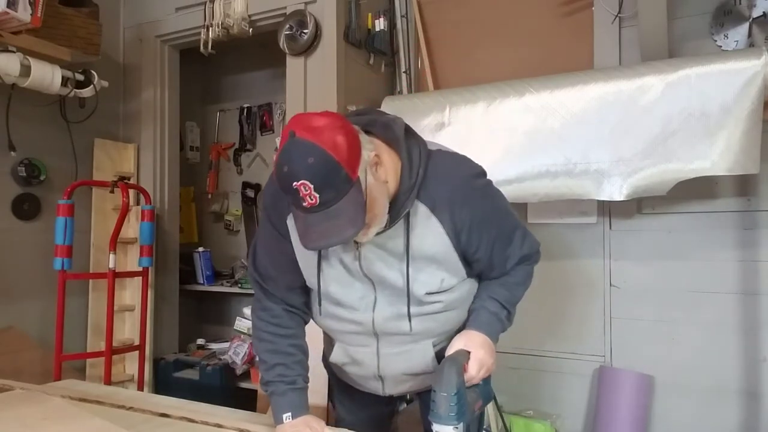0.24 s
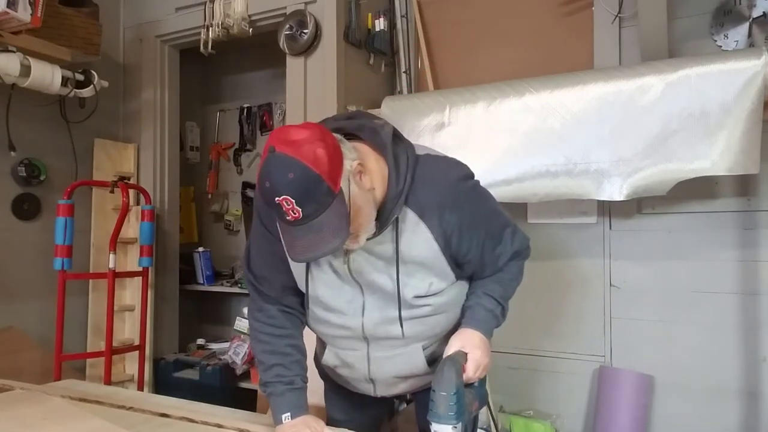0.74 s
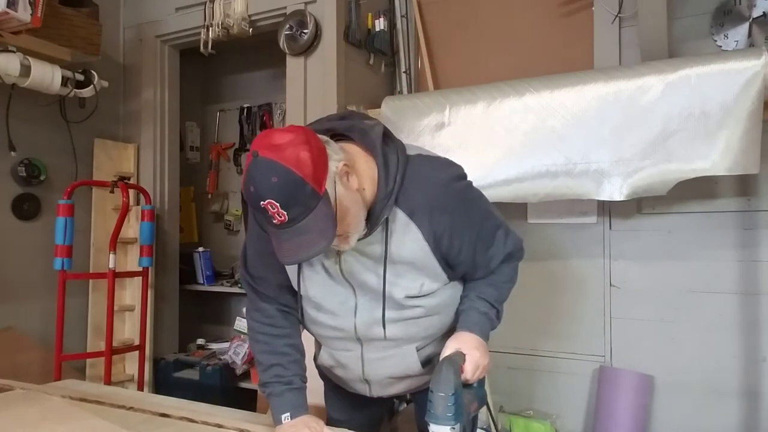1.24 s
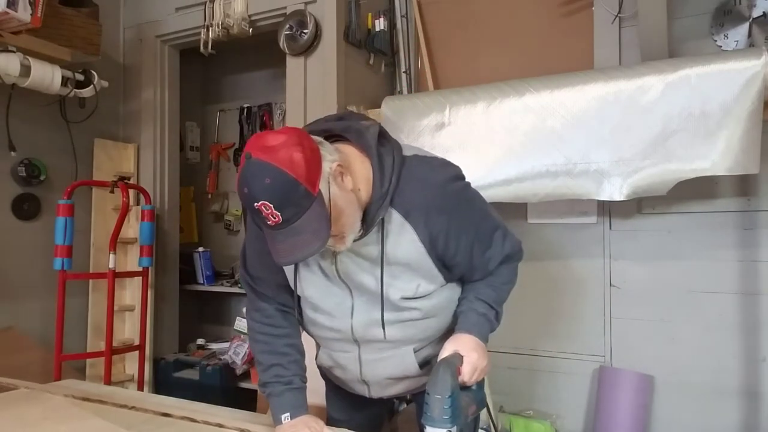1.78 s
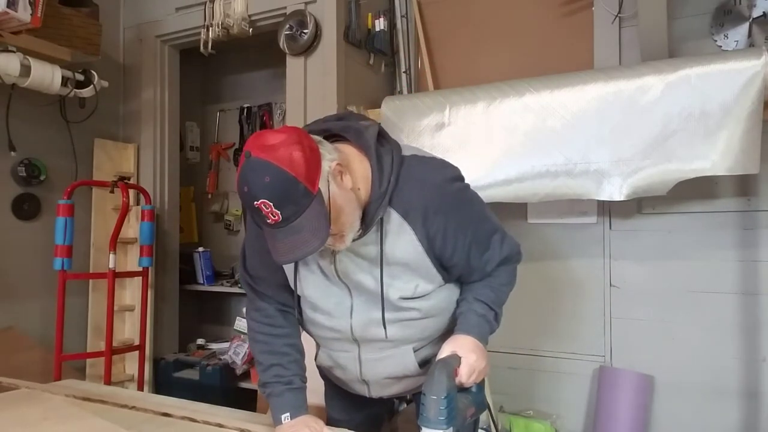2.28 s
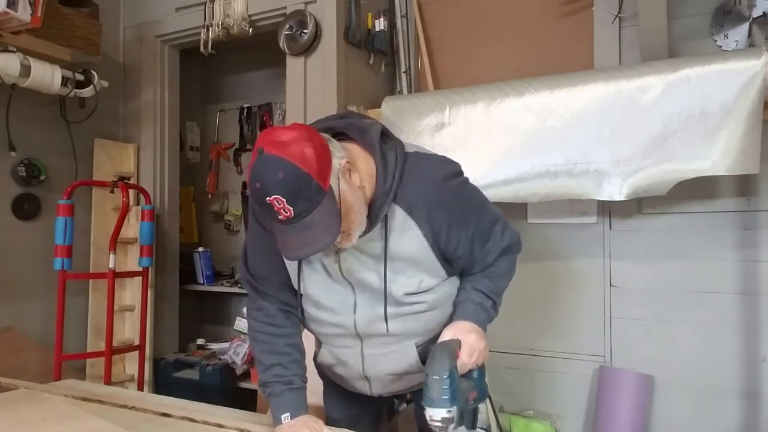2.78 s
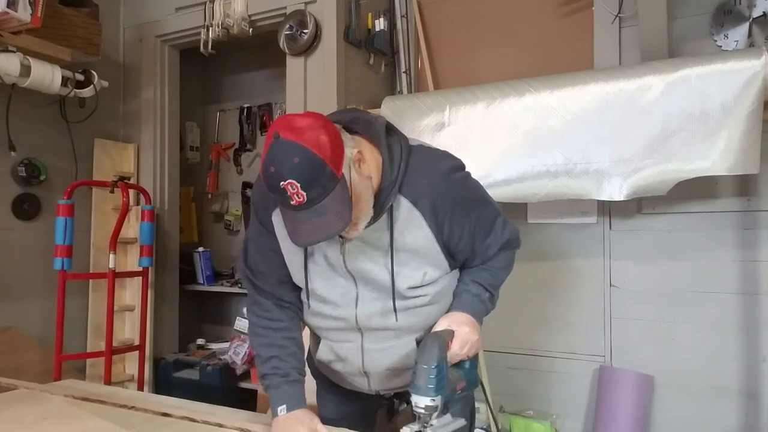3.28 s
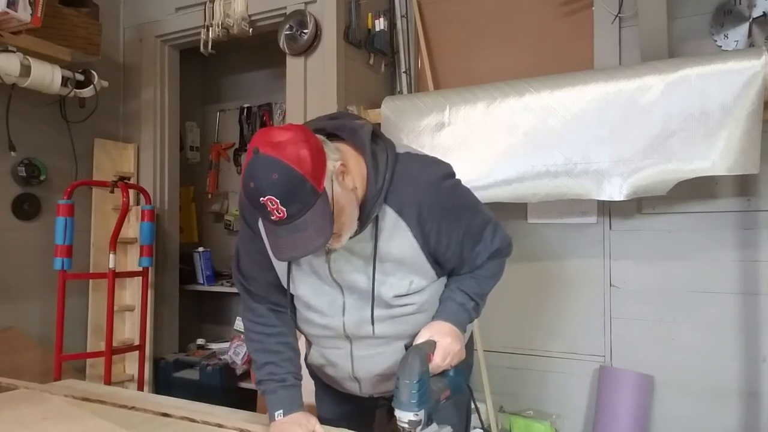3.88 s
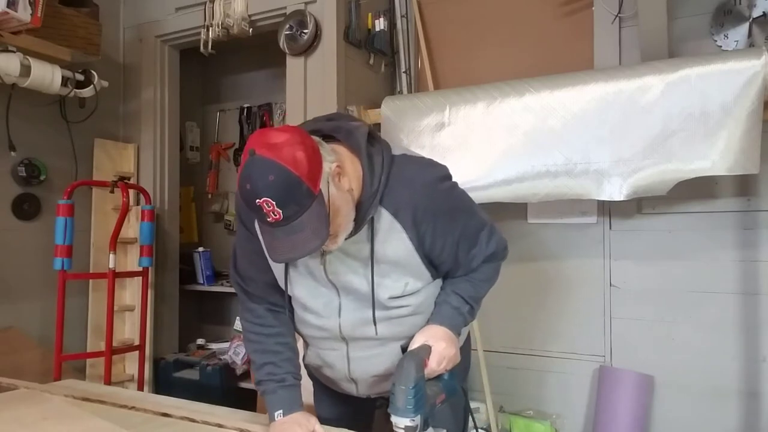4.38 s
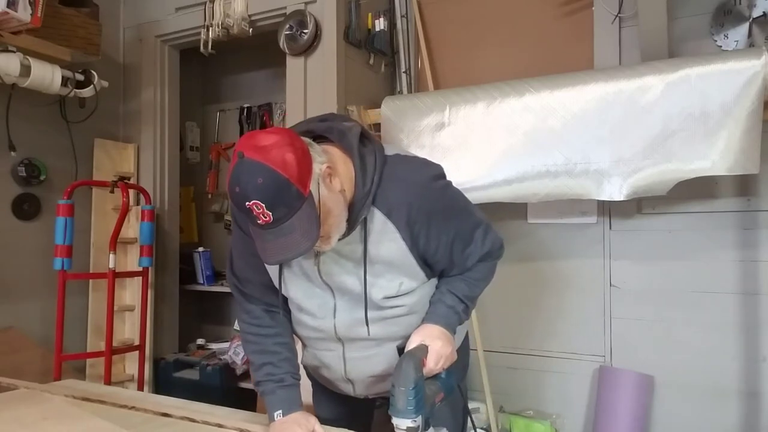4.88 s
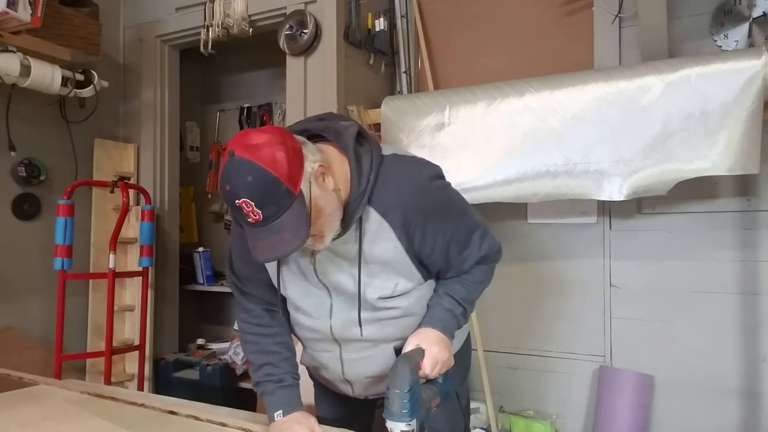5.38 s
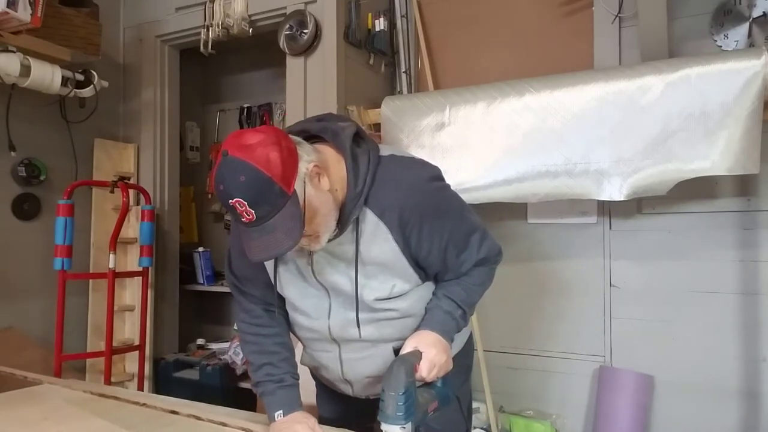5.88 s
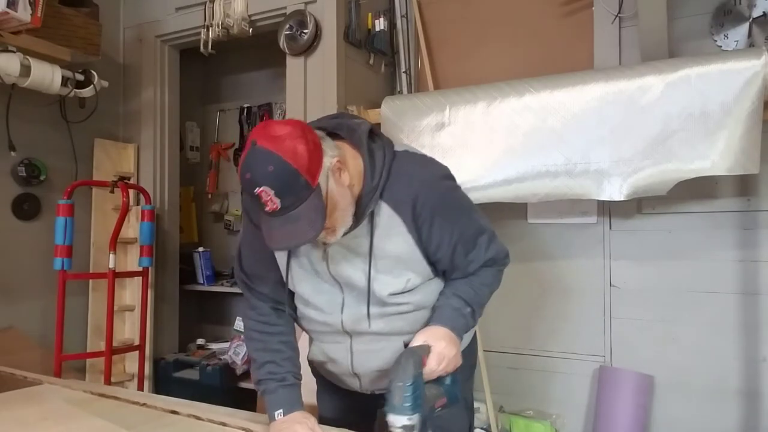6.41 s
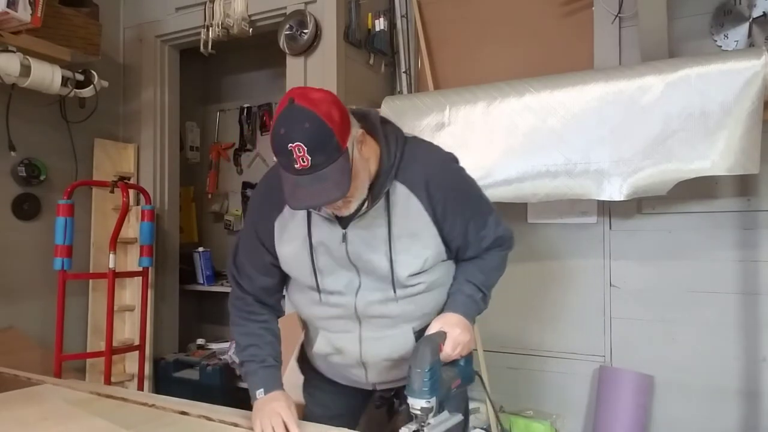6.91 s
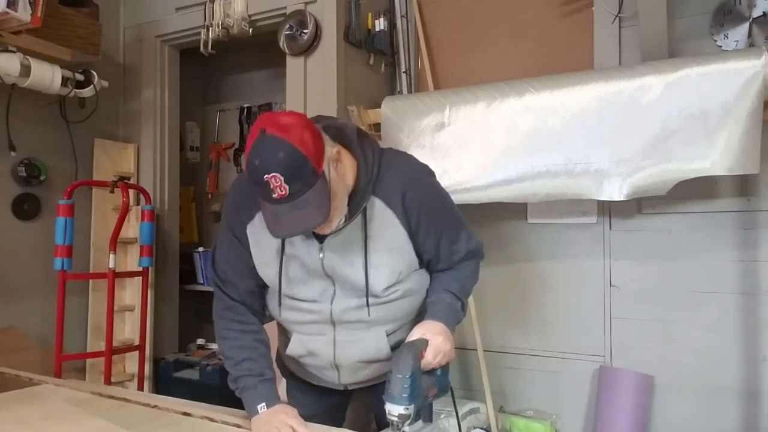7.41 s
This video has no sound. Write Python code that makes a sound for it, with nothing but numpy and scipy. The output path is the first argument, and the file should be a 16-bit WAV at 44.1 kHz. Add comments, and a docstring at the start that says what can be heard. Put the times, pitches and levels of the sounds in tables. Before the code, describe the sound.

In a garage, an electric jigsaw buzzes and tears wood, coasts down whining, wood thumps and rocks, then it cuts again and winds down.

```python
"""A jigsaw makes two short cuts in a sheet of wood in a garage, a couple of metres from two close microphones.
Each time the motor spins up, the blade rasps through, the sheet chatters as the saw is lifted out,
and the motor coasts down with a falling whine. Between the cuts the wood is knocked about and a loose
piece rocks to rest. Stroke-locked clicks, noise and tones make the saw; decaying modes make the wood;
coloured noise makes a faint opening fade, one slide of a sleeve and the quiet background."""
import sys
import numpy as np
from scipy import signal
from scipy.fft import rfft, irfft, next_fast_len
from scipy.io import wavfile
from scipy.ndimage import uniform_filter1d

SR = 44100
rng = np.random.default_rng(int(sys.argv[2]) if len(sys.argv) > 2 else 0)


def output_pcm(signal):
    """Save a mono or channel-first signal as 16-bit PCM at the path in sys.argv[1].

    Samples are clipped to [-1, 1] before scaling.
    """
    pcm = np.clip(np.atleast_2d(signal).T, -1, 1) * 32767
    wavfile.write(sys.argv[1], SR, np.round(pcm).astype(np.int16))


N = 337360
TIME = np.arange(N) / SR

# squeals of the binding blade: t/s, length/s, f/Hz, width/Hz, relative level/dB
SQUEALS = [(.89, 0.071, 2620, 160, -25.5), (1.04, 0.17, 2620, 200, -28.5), (1.13, 0.21, 4950, 400, -32.5),
           (1.418, .2, 3850, 180, -31), (1.875, 0.15, 4315, 100, -26), (1.905, 0.13, 2147, 130, -27.5),
           (2.062, .22, 4080, 200, -31), (5.093, 0.107, 2550, 250, -30), (5.417, 0.19, 3900, 148, -48),
           (6.01, 0.17, 4370, 400, -27.5), (6.038, 0.093, 2104, 400, -21.5)]
# blade strokes per s: deep in the cut, as the blade comes free, and where fan drag equals bearing friction
LOADED_RATE, FREE_RATE, DRAG_RATE = 46.2, 51, 50


def from_db(db):
    """Decibels to gain."""
    return 10 ** (np.asarray(db) / 20)


def rms_one(x):
    """Scale to rms 1."""
    return x / np.sqrt(np.mean(x ** 2) + 1e-20)


def lowpass(x, hz):
    """Two-pole low-pass."""
    return signal.sosfilt(signal.butter(2, min(hz, SR / 3), fs=SR, output="sos"), x)


def highpass(x, hz):
    """Two-pole high-pass."""
    return signal.sosfilt(signal.butter(2, hz, "high", fs=SR, output="sos"), x)


def drift(hz):
    """Random wander of rms 1, slower than the given frequency."""
    return rms_one(lowpass(rng.standard_normal(N + SR), hz)[SR:])


def swell(s, length):
    """Bell-shaped gain around a moment."""
    return np.exp(-(2 * (TIME - s) / length) ** 2)


def ring(x, hz, width_hz):
    """Resonance with gain 1 at its top."""
    r = np.exp(-np.pi * width_hz / SR)
    zeros = (1 - r * r) / 2 * np.array([1, 0, -1])
    poles = [1, -2 * r * np.cos(2 * np.pi * hz / SR), r * r]
    return signal.lfilter(zeros, poles, x + 1e-18)


def response(spectrum, size=8192):
    """Causal (minimum-phase) impulse response with the given spectrum."""
    hz, db = np.transpose(spectrum)
    grid = np.maximum(np.arange(size // 2 + 1) * SR / size, 1)
    gain = from_db(np.interp(np.log(grid), np.log(hz), db))
    # fold the cepstrum onto positive time
    cepstrum = irfft(np.log(gain))
    cepstrum[1:size // 2] *= 2
    cepstrum[size // 2 + 1:] = 0
    return irfft(np.exp(rfft(cepstrum)))


def colour(x, spectrum):
    """Give a white signal a spectrum and keep its power."""
    h = response(spectrum)
    return signal.oaconvolve(x, h / np.linalg.norm(h))[:N]


def even_out(h, size=200):
    """Keep the fine comb of a room response and level its broad colour."""
    spectrum = rfft(h, 2 * len(h))
    power = np.abs(spectrum) ** 2
    for _ in range(4):
        power = uniform_filter1d(power, size)
    return irfft(spectrum / np.sqrt(power))[:len(h)]


def two_ports(mid, side):
    """Two close microphones hear nearly the same bass and different treble."""
    # side against mid in the diffuse field: f/Hz, level/dB
    width = [(40, -23), (170, -18), (350, -8.5), (700, -2.5), (1400, 1.5), (4000, 1), (12000, 3)]
    side = signal.oaconvolve(side, response(width))[:len(mid)]
    return np.array([mid + side, mid - side])


def garage(x, t60_s=0.45, direct_db=-2, early_db=-1, early_s=0.0039):
    """Direct sound, close reflections from sheet and wall, then a diffuse tail."""
    t = TIME[:SR * 3 // 4]
    tail = from_db(-60 * t / t60_s) * (t > .004)
    early = np.exp(-t / early_s) * (t > .0005)
    spread = np.hypot(tail / np.linalg.norm(tail), from_db(early_db) * early / np.linalg.norm(early))
    mid, side = rng.standard_normal((2, len(t))) * spread
    mid[0] += from_db(direct_db)
    ports = two_ports(even_out(mid), from_db(-2.5) * even_out(side))
    return signal.oaconvolve(x[None], ports, axes=1)[:, :N]


def travelling(x, turns_per_s=.7):
    """As the saw moves along, its pattern of reflections keeps changing."""
    angle = 2 * np.pi * turns_per_s * TIME
    # the second pattern is a quarter cycle out of phase, so the level holds
    quarter = np.imag(signal.hilbert(x, next_fast_len(N)))[:N]
    return np.cos(angle) * garage(x) + np.sin(angle) * garage(quarter)


def quiet_garage():
    """The background between events is steady coloured noise, wide in the treble."""
    # f/Hz, relative level/dB
    quiet = [(15, -22.5), (25, 0), (27, -5.5), (53, -8.5), (148, -16.5), (297, -7.5), (582, -17.5),
             (1300, -20), (8810, -39.5), (13500, -31), (15500, -26)]
    mid, side = (colour(white, quiet) for white in rng.standard_normal((2, N)))
    return highpass(from_db(-66.5) * two_ports(mid, side), hz=35)


def soft_noises():
    """A faint noise fades at the very start; then a sleeve sliding over the sheet makes one soft swell."""
    # opening noise, then sleeve: t/s, length/s, level/dB
    soft_times = [(0, 0.043, -63.5), (0.261, 0.153, -55)]
    # f/Hz, relative level/dB
    soft_spectrum = [(59, -69), (100, -37), (152, -10), (268, -14), (502, -11), (718, -16), (1140, -13),
                     (15000, -36.5)]
    gain = sum(from_db(db) * swell(s, length) for s, length, db in soft_times)
    return gain * colour(rng.standard_normal(N), soft_spectrum)


def loose_piece():
    """A loose piece of wood bounces and rocks; every tap rings the same few modes."""
    # t/s, level/dB
    taps = [(4.126, -28), (4.415, -33), (4.475, -45), (4.531, -54.5), (4.71, -57), (4.771, -57)]
    # modes of the piece: f/Hz, relative level/dB, t60/s
    piece_modes = [(198, -9, 0.11), (271, -16, .07), (314.4, 2, 0.14), (388, -6.5, .08), (508, -11, 0.088),
                   (993, -12.5, .07)]
    t = TIME[:SR // 2]
    tone = sum(from_db(db - 60 * t / t60) * np.sin(2 * np.pi * hz * t) for hz, db, t60 in piece_modes)
    s, db = np.transpose(taps)
    return signal.oaconvolve(np.bincount((s * SR).astype(int), from_db(db), N), tone)[:N]


def wood_blows(crunch_s=0.012, crunch=0.14):
    """Each blow is a push and a short crunch; it sounds the wood broadly and rings the sheet's modes."""
    # knocks of wood: t/s, relative level/dB, brightness/Hz, boom/dB
    knocks = [(.856, -12.5, 1210, -16.5), (2.555, -3.5, 1990, -12), (2.737, -10, 2160, 3),
              (3.312, -23.5, 170, 6.5), (3.345, -27, 170, 7), (3.43, -47, 170, -3), (3.767, -19, 1110, 16),
              (3.818, -15, 1010, 16), (3.832, -18, 1000, 6), (3.855, -12, 1740, 14), (4.103, -28, 2000, 2),
              (4.112, -22.5, 6000, -13), (4.113, -9, 1310, 7.5), (4.411, -33.5, 1850, -9),
              (4.981, -12, 920, -22), (5.039, -5.5, 2380, -22), (5.075, -10.5, 2000, -24),
              (5.108, -10.5, 2600, -19), (6.359, -4, 1440, -23), (6.373, -12.5, 2000, -21),
              (7.325, -24.5, 260, 16), (7.355, -23, 229, 15)]
    # the blade catches and hammers the sheet once a stroke:
    # t/s, length/s, blows per s, relative level/dB, fading/(dB per s), brightness/Hz, boom/dB
    chatter = [(2.579, .13, 46, -6.5, 64, 1190, 1.5), (2.756, .09, 40, -21.5, 100, 1300, 15),
               (6.388, .125, 51, -11, 101, 1890, -30)]
    # modes of the sheet: f/Hz, relative level/dB, t60/s
    sheet_modes = [(80.2, -26, 1), (105, -14.5, 0.17), (137, -7.5, 0.066), (180, -6, 0.26),
                   (215.7, -9.5, 0.44), (336, -15, 0.11), (386, 2, .1), (526, 6, 0.15), (650, -9.5, 0.087),
                   (795, 2.5, 0.15), (1060, -18.5, 0.053)]
    # broad sound of struck wood: f/Hz, relative level/dB
    wood = [(25, -26.5), (70, -18), (130, -6.5), (250, 0), (550, 1), (1100, 0.5), (2000, -1), (4000, -3.5),
            (8000, -4.5), (16000, -1)]
    blows = list(knocks)
    for s, length, rate, db, fade, bright_hz, boom_db in chatter:
        blows += [(s + t, db - fade * t, bright_hz, boom_db) for t in np.arange(0, length, 1 / rate)]
    hz, mode_db, t60 = np.transpose(sheet_modes)[:, :, None]
    broad, rings = np.zeros((2, N + SR))
    t = TIME[:SR // 2]
    modes = from_db(mode_db - 60 * t / t60) * np.sin(2 * np.pi * hz * t)
    for s, db, bright_hz, boom_db in blows:
        at, size = round(s * SR), from_db(db) * np.sqrt(1000 / bright_hz)
        grit = even_out(rng.standard_normal(len(t)) * np.exp(-t / crunch_s), size=120)
        push = 1.06 * (t == 0)
        blow = push + crunch * np.sqrt(crunch_s * SR / 2) * grit
        broad[at:at + len(t)] += size * lowpass(blow, bright_hz)
        # a blow far from the supports bends the whole sheet and favours its lowest modes
        strength = from_db(boom_db * hz[0] / hz + 2.2 * rng.standard_normal(hz.shape))
        rings[at:at + len(t)] += size * lowpass(np.sum(strength * modes, axis=0), bright_hz)
    return from_db(24.5) * colour(broad, wood) + from_db(-18.5) * rings[:N]


def buzzes(edge_s=0.0094, overtone_db=-11):
    """The pinched blade drags the sheet: stick and slip lock onto a low resonance until it comes free."""
    # t/s, length/s, f/Hz, level of the fundamental/dB
    buzz_times = [(2.577, 0.109, 214, -23), (6.347, 0.173, 208, -23)]
    out, wander = np.zeros(N), 0.073 * drift(51)
    for s, length, hz, db in buzz_times:
        held = np.clip(np.minimum(TIME - s, s + length - TIME) / edge_s, 0, 1)
        slip = 2 * np.pi * hz * TIME + wander
        overtones = np.sin(3 * slip) + np.sin(5 * slip) / 2
        out += from_db(db) * held * (np.sin(slip) + from_db(overtone_db) * overtones)
    return out


def motor_speed():
    """Strokes per s: a quick spin-up, a slow gain as the cut frees, then coasting against drag and friction."""
    # switch on t/s, switch off t/s, spin-up time/s, spin-up shape (1 = exponential), coasting time/s
    runs = [(.83, 2.546, .187, 1, 1.736), (4.965, 6.26, .1135, .79, 1.85)]
    speed = np.zeros(N)
    for on, off, spin_s, shape, coast_s in runs:
        t = np.maximum(TIME - on, 0)
        spin_up = 1 - np.exp(-(t / spin_s) ** shape)
        driven = np.interp(TIME, [on, off], [LOADED_RATE, FREE_RATE]) * spin_up
        time_left = np.clip(1 - (TIME - off) / coast_s, 0, 1)
        coasting = DRAG_RATE * np.tan(np.arctan(FREE_RATE / DRAG_RATE) * time_left)
        speed += np.where(TIME < off, driven, coasting)
    return speed


def feed(attack_s=.012, release_s=0.033):
    """The push of the hand sets rasp, drumming, gear tone and hum, beside working (0-1) and strain (dB)."""
    # start t/s, hardest push t/s, end t/s, then relative levels/dB:
    # rasp, gear tone, drumming at entry, hum, extra air and rattle
    cuts = [(0.838, 1.241, 2.56, -19.5, -23.5, -23.5, -43.5, 6.5),
            (4.964, 5.17, 6.375, -19, -19.5, -17, -39.5, 5.5)]
    # the hand leans in up to the hardest push and eases off after it
    lean_db_per_s, ease_db_per_s = 8, 7
    # the shoe drums at entry, then settles on the sheet
    settle_db_per_s, settled_db = 19, -37.5
    # dB of gear tone and of hum for each dB of push
    gear_follows, hum_follows = 2.2, 1.0
    controls = []
    for start, hardest, end, rasp_db, gear_db, entry_db, hum_db, strain_db in cuts:
        working = np.clip(np.minimum((TIME - start) / attack_s, (end - TIME) / release_s), 0, 1)
        push_db = np.minimum(lean_db_per_s * (TIME - hardest), ease_db_per_s * (hardest - TIME))
        rasp = from_db(rasp_db + push_db)
        entry = from_db(entry_db - settle_db_per_s * np.maximum(TIME - start, 0))
        drum = entry + from_db(settled_db + push_db)
        gear_load = from_db(gear_db + gear_follows * push_db)
        shake = from_db(hum_db + hum_follows * push_db)
        controls.append([working * control for control in (1, strain_db, rasp, drum, gear_load, shake)])
    return np.sum(controls, axis=0)


def shudder(speed):
    """How close the saw is to the stroke rate at which it shakes (0-1)."""
    centre_rate, spread_rate = 18.3, 5.2  # strokes per s
    return np.exp(-((speed - centre_rate) / spread_rate) ** 2)


def air_gain(speed, working, strain_db, fade_rate=4):
    """Air and rattle grow with speed and strain, swell in the shudder and vanish at rest."""
    # reference level at full speed, loss on the way down to rest, gain in the shudder (dB)
    full_db, slowing_db, shudder_db = -37.5, 19, 5
    db = full_db - slowing_db * (1 - speed / FREE_RATE) + strain_db
    db = db + shudder_db * (1 - working) * shudder(speed)
    return from_db(db) * np.minimum(speed / fade_rate, 1)


def contacts(turn, speed, jitter_s, uneven_db, count):
    """The same set of small impacts comes round on every stroke, never quite alike; rms about 1."""
    place = (np.arange(count) + rng.random(count)) / count
    size = rms_one(rng.standard_normal(count))
    strokes = np.arange(400)[:, None]
    when = np.interp(strokes + place, turn, TIME, right=-1)
    when = when + jitter_s * rng.standard_normal((len(strokes), count))
    sizes = size * rms_one(from_db(uneven_db * rng.standard_normal(when.shape)))
    heard = (when > 0) & (when < TIME[-1])
    clicks = np.bincount((when[heard] * SR).astype(int), sizes[heard], N)
    return clicks * np.sqrt(SR / (count * np.maximum(speed, 25)))


def blend(clicks, noise, share):
    """Mix with the given share of the power in the clicks."""
    share = np.clip(share, 0, 1)
    return np.sqrt(share) * clicks + np.sqrt(1 - share) * noise


def hum(turn, speed, shake):
    """The plunger shakes the whole sheet at multiples of the stroke rate, once the saw is fast enough."""
    # multiple of the stroke rate, relative level/dB
    multiples = [(1, -10), (2, -16), (3, -21), (4, -1), (5, -6), (6, -3.5), (7, -4.5), (8, -22), (10, 7)]
    from_rate, spread_rate = 44.1, 3.3  # strokes per s
    fast = (1 + np.tanh((speed - from_rate) / spread_rate)) / 2
    tones = np.zeros(N)
    for k, db in multiples:
        tones += from_db(db + 2.8 * drift(3)) * np.sin(2 * np.pi * (k * turn + rng.random()))
    return shake * fast * tones


def machine(turn, speed, air):
    """Fan air and the rattle of crank and plunger, coloured by the housing."""
    # broad spectrum: f/Hz, relative level/dB
    machine_spectrum = [(60, -41), (150, -16.5), (350, -13), (550, -7.5), (900, -7), (1500, -5.5),
                        (2200, -1.5), (3300, -7.5), (4800, -9.5), (7500, -14.5), (9700, -17.5),
                        (13000, -13), (15800, -15.5)]
    # resonances of the housing: f/Hz, width/Hz, level over the broad rattle/dB
    housing = [(729, 100, -4), (1590, 220, -3.5), (2300, 150, -32), (2860, 440, -20.5), (3214, 370, -3.5)]
    rattle = contacts(turn, speed, jitter_s=.00006, uneven_db=3.2, count=30)
    # the air swells twice a stroke
    rush_db = 1.7 * drift(150) + 1.5 * np.cos(4 * np.pi * turn)
    rush = rms_one(rng.standard_normal(N) * from_db(rush_db))
    broad = colour(blend(rattle, rush, share=0.12), machine_spectrum)
    resonances = sum(from_db(db) * ring(broad, hz, width_hz) for hz, width_hz, db in housing)
    return from_db(8.5) * air * (broad + resonances)


def rotor_tones(turn, speed, air, gear_load, idle_gear_db=-7, shudder_gear_db=9.0):
    """The rotor sings at its own rate, at the gear mesh and at the fan's blade rate."""
    rotor_turns, pinion_teeth, fan_blades = 31 / 3, 4, 40  # rotor turns are per stroke
    rotor = 2 * np.pi * rotor_turns * turn
    pace = speed / FREE_RATE
    unbalance = air * pace ** 4 * np.sin(rotor)
    # the crank loads the gears unevenly, which spreads the mesh tone into a rough band
    mesh = pinion_teeth * rotor + pace * (1.6 * np.sin(2 * np.pi * turn) + 1.37 * drift(70))
    idle_gears = from_db(idle_gear_db + shudder_gear_db * shudder(speed)) * air
    gear_gain = np.hypot(gear_load * pace, idle_gears) * (1 + 0.72 * drift(99))
    # the third harmonic sounds only at low speed
    third = from_db(-10.5) * (speed < 30) * np.sin(3 * mesh)
    gears = gear_gain * (np.sin(mesh) + from_db(-9.5) * np.sin(2 * mesh) + third)
    whine_db = np.interp(speed, [7, 11, 28.4, 32, 43], [-7, 2, -5, 10.5, 3.5])
    whine_phase = fan_blades * rotor + (0.37 + 1.0 * pace) * drift(110)
    whine = air * from_db(whine_db) * np.sin(whine_phase)
    return from_db(-4) * unbalance + gears + whine


def squeals(turn):
    """The blade rubs the side of the kerf and rings in pulses."""
    out = np.zeros(N)
    for s, length, hz, width_hz, db in SQUEALS:
        phase = 2 * np.pi * hz * TIME
        band = drift(width_hz) * np.sin(phase) + drift(width_hz) * np.cos(phase)
        out += from_db(db) * swell(s, length) * band
    return out * (1 + .5 * np.cos(2 * np.pi * turn))


def cutting(turn, speed, rasp, drum):
    """Teeth tear fibres on the upstroke; the shoe drums on the sheet."""
    # three spectra, each f/Hz, relative level/dB
    rasp_spectrum = [(200, -25), (500, -10.5), (800, 3), (1100, 3.5), (1750, 3.5), (2600, 3), (3300, 1.5),
                     (5000, -29), (9000, -35.5), (16000, -42.5)]
    drumming = [(30, -35.5), (90, -25.5), (150, -12.5), (200, -11), (320, 4), (410, -7), (520, -2.5),
                (700, -2), (1500, -39.5)]
    tooth_hiss = [(1500, -21), (3000, -6.5), (3900, 0.5), (5200, -8.5), (7000, -13), (12000, -27.5)]
    binding = sum(from_db(db) * swell(s, length) for s, length, _, _, db in SQUEALS)
    # tooth hiss follows the rasp and the squeals of the binding blade
    hiss = from_db(-11.5) * rasp + from_db(-10) * binding
    bite = from_db(6.3 * np.cos(2 * np.pi * turn) + 1.1 * np.cos(4 * np.pi * turn))
    fibres = rms_one(rng.standard_normal(N) * bite * from_db(4.2 * drift(900)))
    teeth = contacts(turn, speed, jitter_s=.00005, uneven_db=2.5, count=16)
    shoe = contacts(turn, speed, jitter_s=.0001, uneven_db=3.9, count=9)
    drum_noise = blend(shoe, rng.standard_normal(N), share=0.75)
    return (from_db(-0.5) * rasp * colour(blend(teeth, fibres, share=0.4), rasp_spectrum)
            + from_db(-7.0) * drum * colour(drum_noise, drumming)
            + from_db(2.0) * hiss * colour(blend(teeth, fibres, share=0.13), tooth_hiss))


def scene():
    """One motor speed and one push of the hand drive every part of the saw."""
    speed = motor_speed()
    working, strain_db, rasp, drum, gear_load, shake = feed()
    # under load the speed wavers with the grain of the wood
    waver = .003 * drift(20) * working
    turn = np.cumsum(speed * (1 + waver)) / SR  # strokes so far
    air = air_gain(speed, working, strain_db)
    saw = machine(turn, speed, air) + rotor_tones(turn, speed, air, gear_load)
    saw += cutting(turn, speed, rasp, drum) + working * squeals(turn)
    wood = highpass(wood_blows(), hz=58) + loose_piece()
    # the saw is a little louder in the left microphone
    saw_heard = travelling(highpass(saw, hz=90)) * from_db([[.45], [-.45]])
    return quiet_garage() + garage(soft_noises() + wood) + buzzes() + hum(turn, speed, shake) + saw_heard


def record(dry):
    """The highest peaks are rounded and the top is cut."""
    rounded = 1.1 * np.tanh(dry / 1.1)
    return signal.sosfilt(signal.ellip(12, .1, 90, 15850, fs=SR, output="sos"), rounded)


dry = scene()
out = record(dry)
output_pcm(out)
```